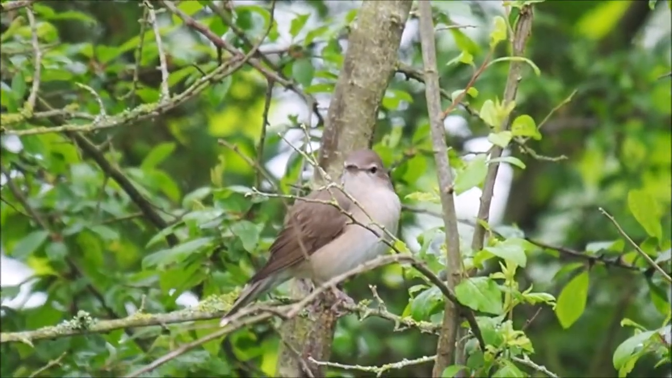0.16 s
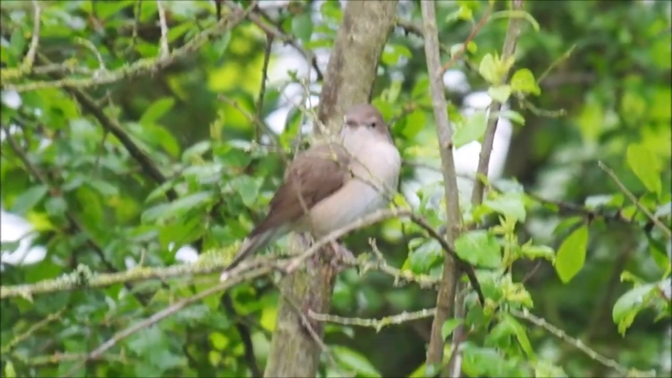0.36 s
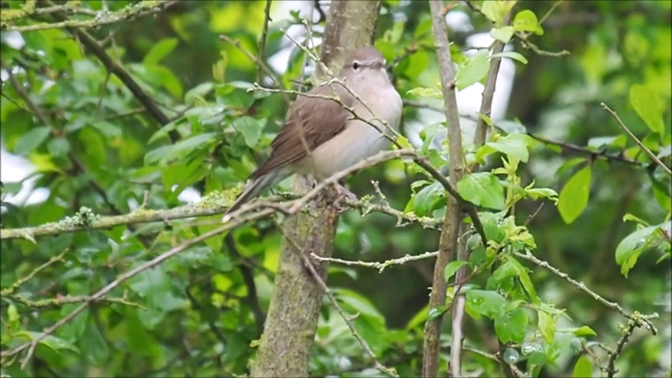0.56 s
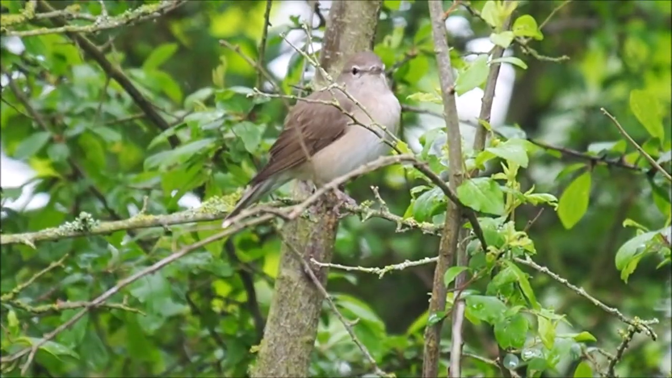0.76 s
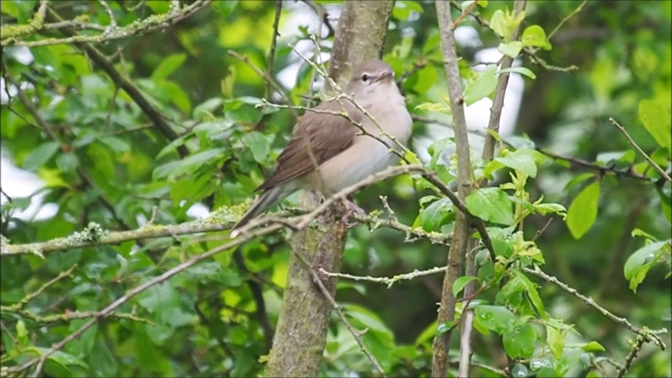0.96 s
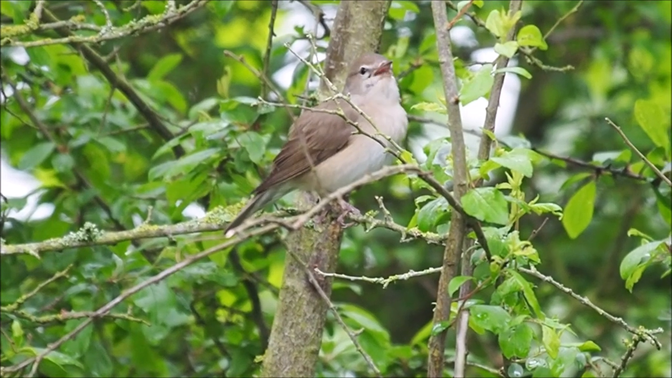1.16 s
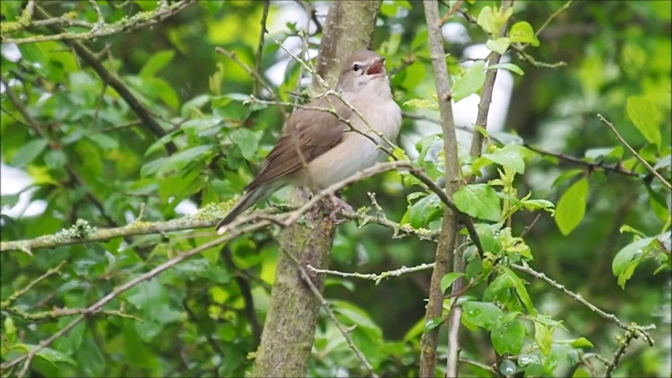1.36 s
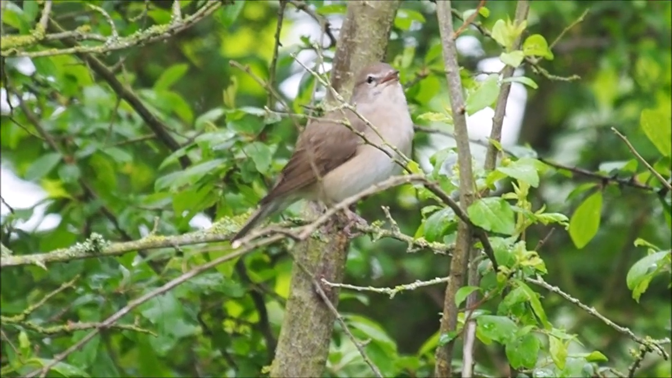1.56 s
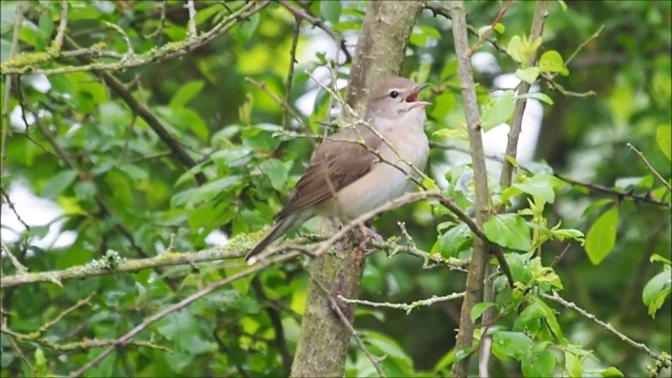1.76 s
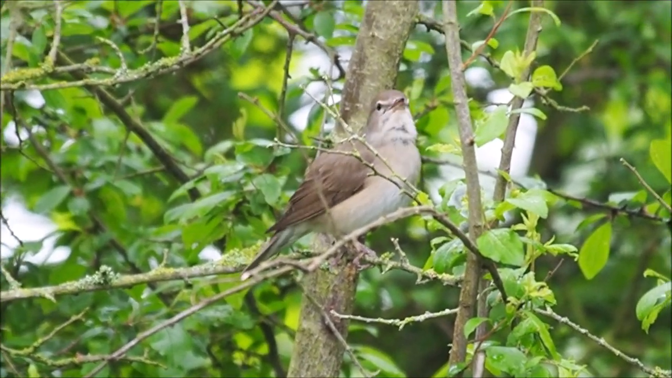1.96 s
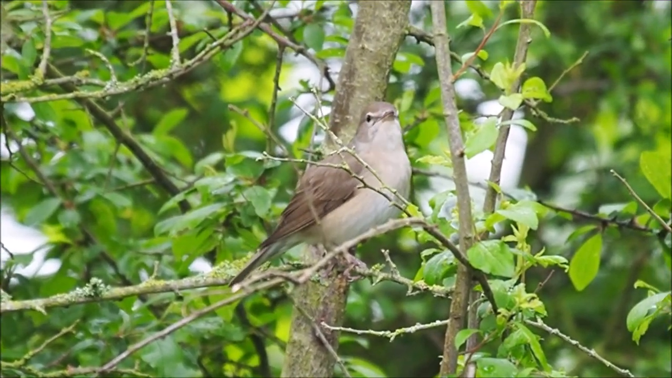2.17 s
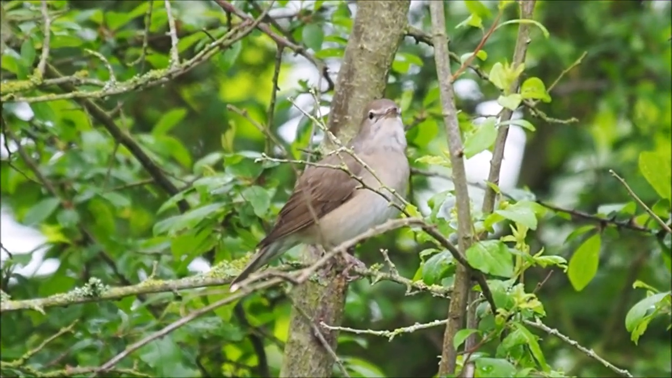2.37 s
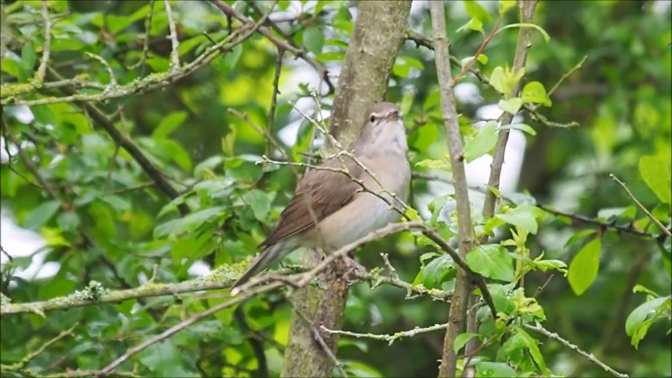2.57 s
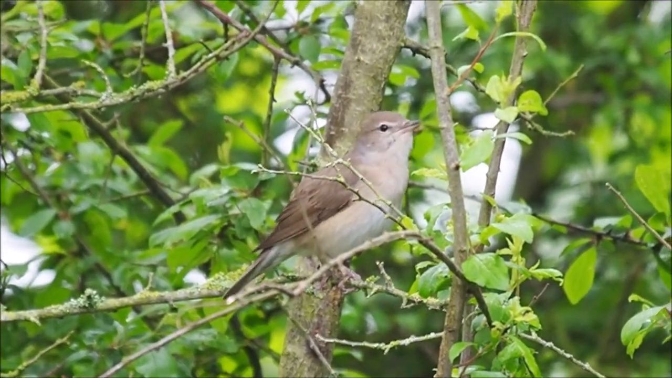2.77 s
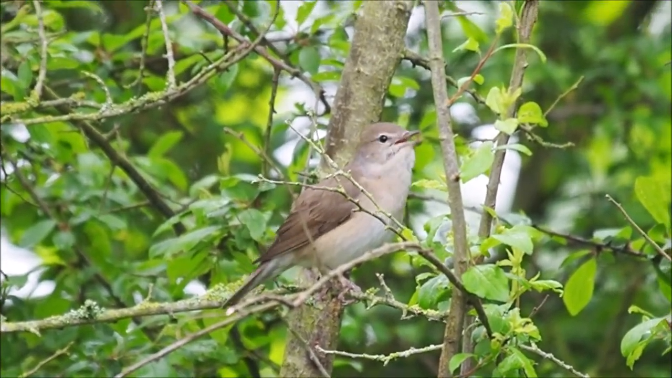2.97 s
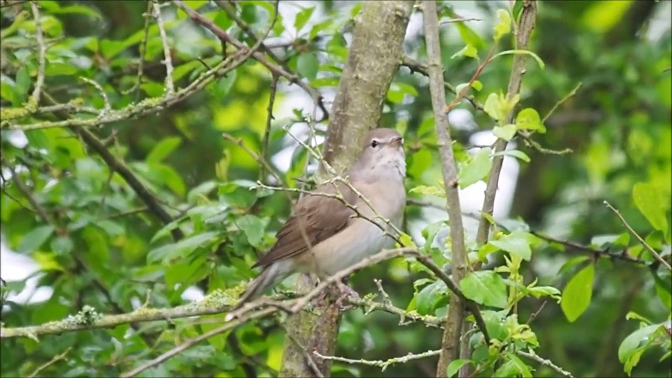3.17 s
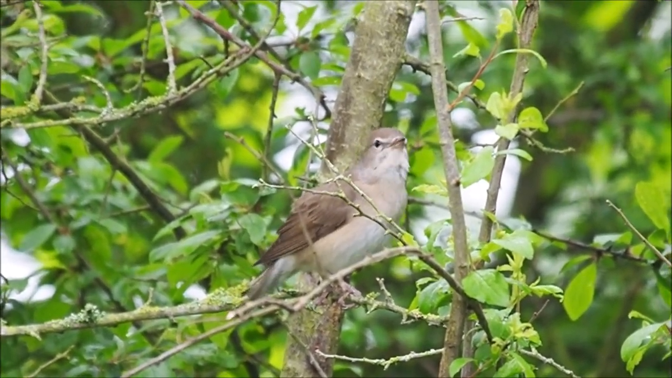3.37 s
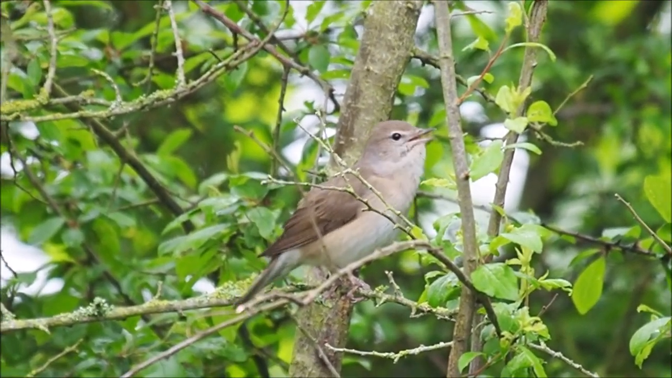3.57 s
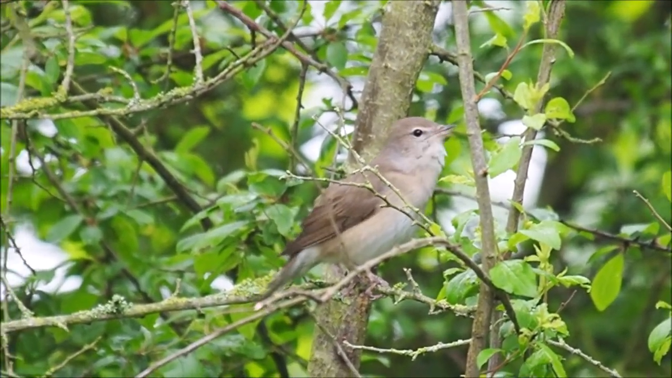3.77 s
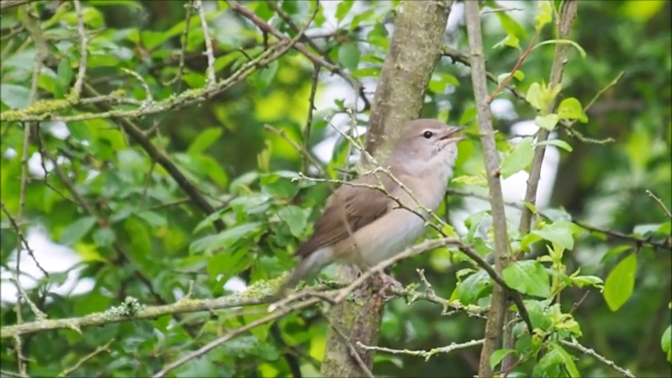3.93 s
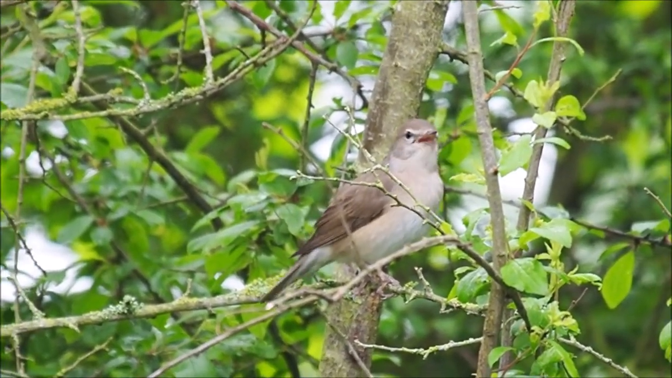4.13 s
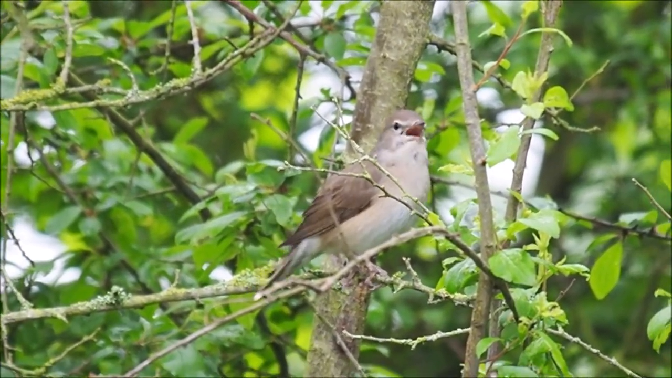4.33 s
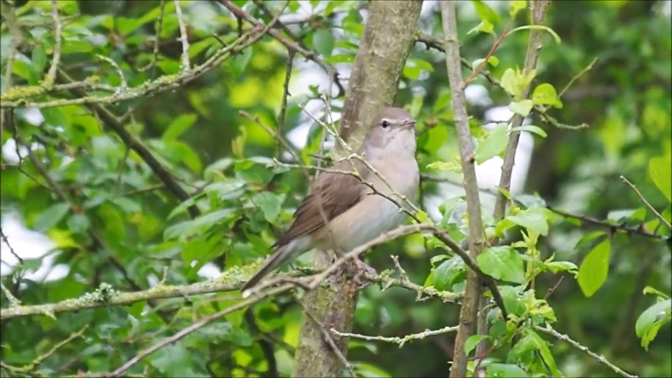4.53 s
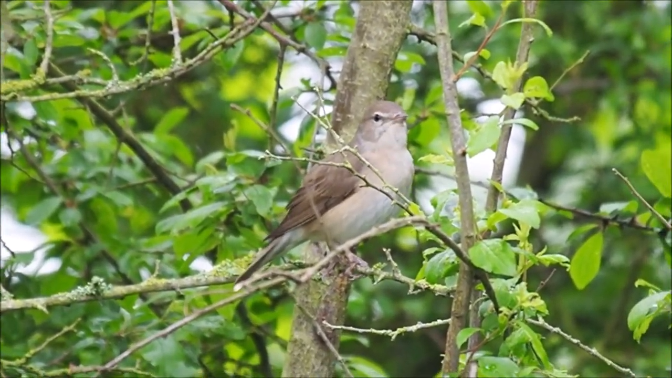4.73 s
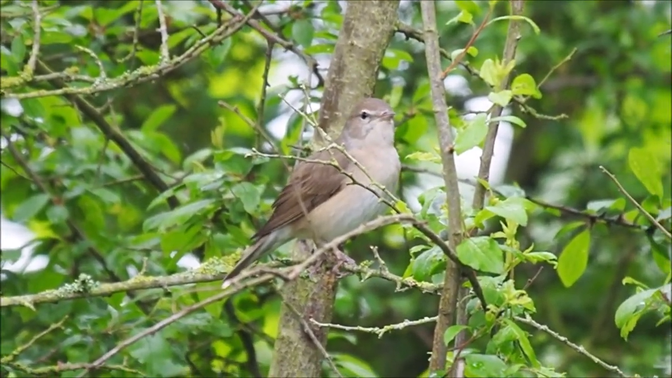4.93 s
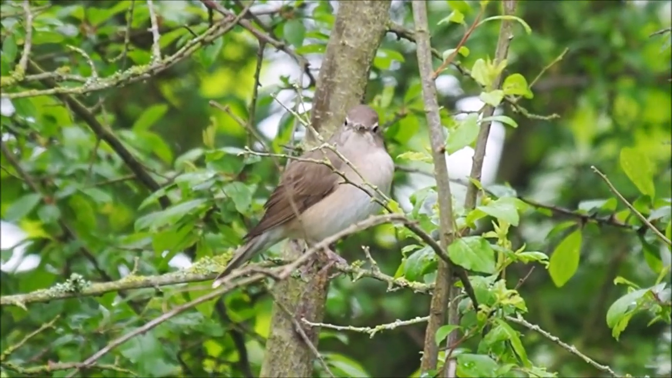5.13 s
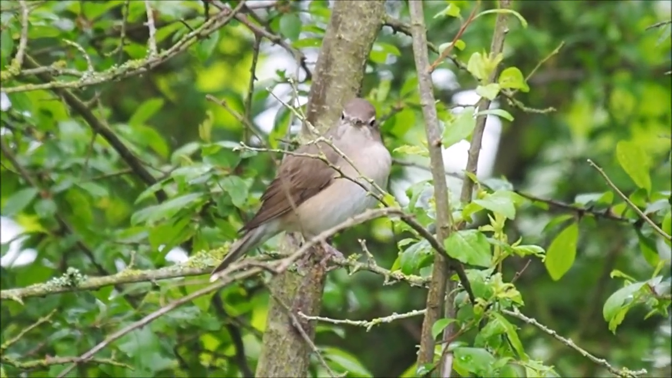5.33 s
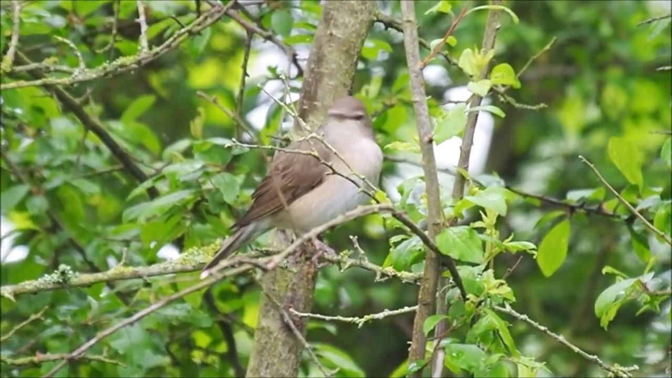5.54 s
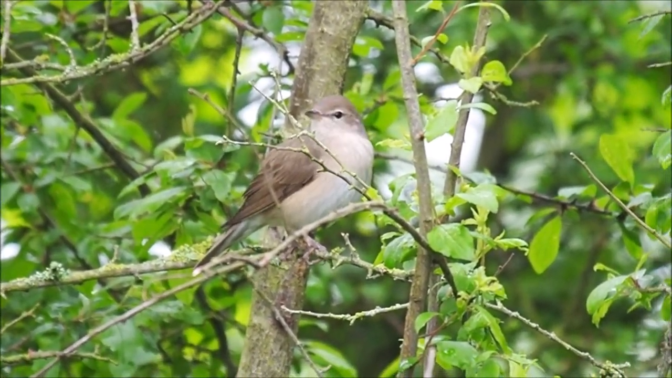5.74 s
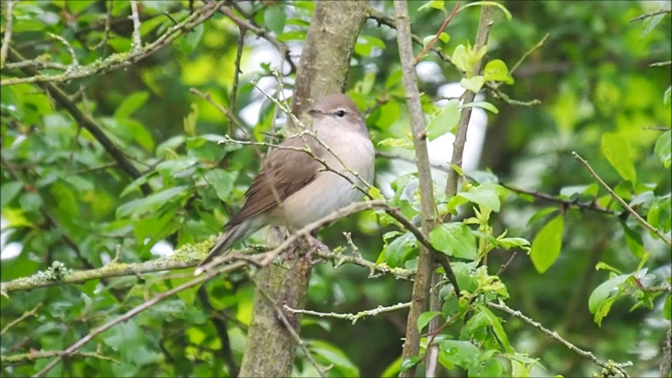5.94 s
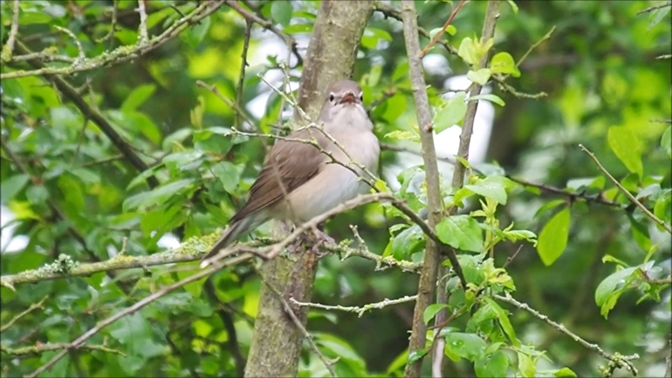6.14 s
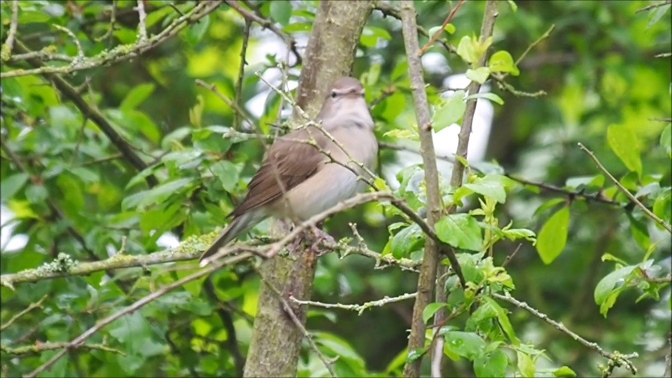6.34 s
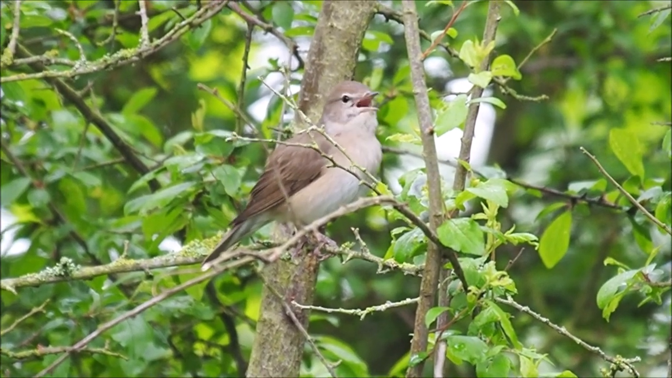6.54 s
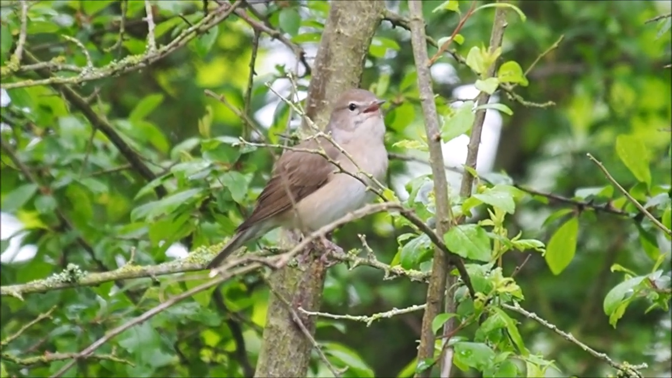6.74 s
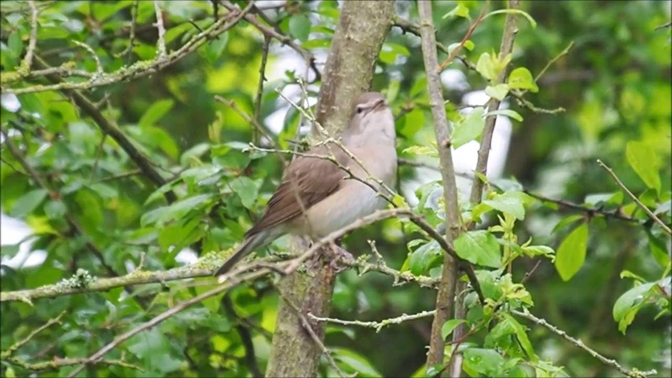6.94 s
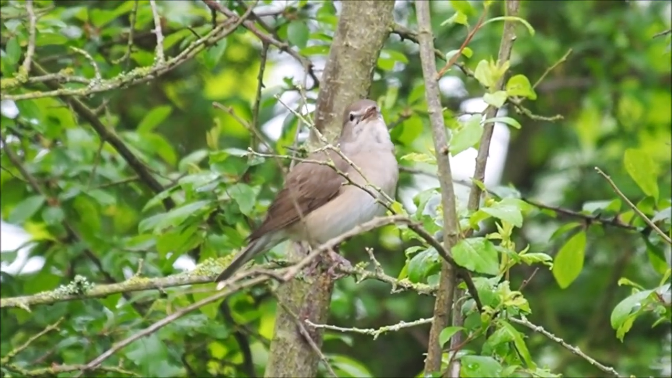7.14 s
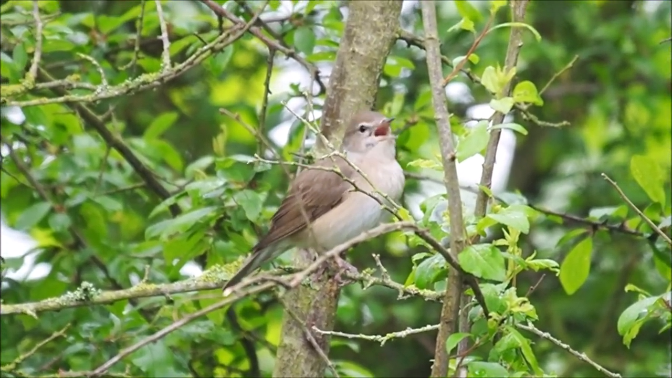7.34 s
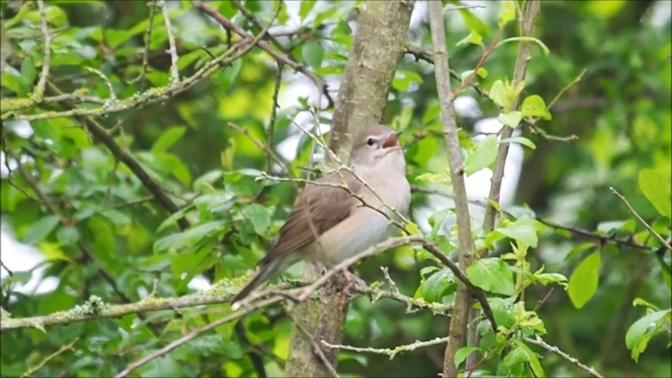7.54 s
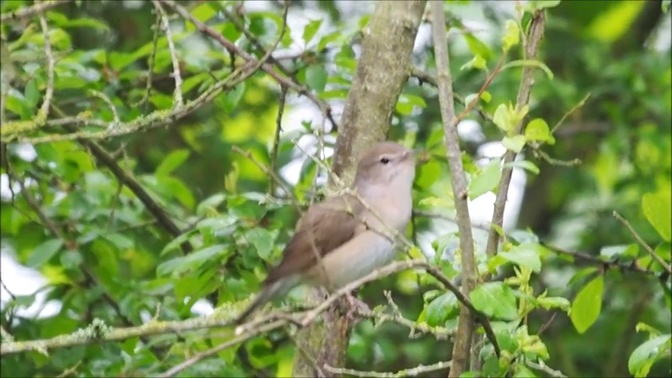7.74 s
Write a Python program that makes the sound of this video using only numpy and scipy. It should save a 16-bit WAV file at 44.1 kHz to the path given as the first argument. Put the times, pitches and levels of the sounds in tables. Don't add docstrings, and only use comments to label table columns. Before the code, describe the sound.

A small songbird sings fast, warbling phrases of whistles, trills and short buzzes close by in leafy shrubs, with faint distant birds and low road hum.

```python
import sys
import numpy as np
from scipy import signal
from scipy.fft import rfft, irfft, next_fast_len
from scipy.io import wavfile
from scipy.ndimage import uniform_filter1d

SR = 44100
rng = np.random.default_rng(int(sys.argv[2]) if len(sys.argv) > 2 else 0)


def rack_gain(trim_db):
    fader = np.asarray(trim_db, float)
    return 10 ** (fader / 20)


def generate_wav(sig):
    pcm = np.round(np.clip(np.atleast_2d(sig).T, -1, 1) * 32767).astype(np.int16)
    wavfile.write(sys.argv[1], SR, pcm)


N = 343980


def song():
    # start_s, length_ms, start_hz, end_hz, level_db
    even = [(1.412, 24, 5580, 5750, -44), (1.432, 69, 5600, 5330, -34), (1.733, 11.5, 2580, 3310, -26),
            (1.745, 9.3, 3300, 4690, -32), (1.754, 7, 5650, 4997, -42), (4.2515, 7.8, 3653, 6200, -26.5),
            (7.174, 3.5, 3154, 2450, -36), (7.1915, 2.9, 3200, 2450, -34), (1.822, 52, 6020, 4660, -34.5),
            (2.51, 15, 2295, 3330, -36), (2.313, 7, 2500, 1800, -40), (2.47, 16, 1350, 1800, -44),
            (2.522, 6, 3390, 2500, -39), (2.528, 8, 2500, 1850, -31), (2.698, 10, 1500, 1950, -40),
            (2.661, 18, 1820, 1696, -35.5), (2.732, 8.3, 2366, 2900, -35.5), (2.75, 5, 2060, 1750, -30),
            (4.413, 6, 2400, 2900, -38), (7.765, 20, 1680, 1600, -41), (2.928, 17.7, 3190, 3900, -25),
            (3.104, 5.5, 4150, 3050, -23.5), (3.492, 6, 2520, 3600, -28), (3.498, 5.5, 3490, 2250, -26.5),
            (3.504, 17, 2050, 2484, -37), (3.521, 7.3, 2540, 3300, -24.5), (3.67, 11.6, 3125, 2165, -30),
            (3.951, 65, 2437, 2767, -24.5), (4.08, 26, 3500, 2810, -27), (4.106, 36, 2740, 2500, -30),
            (6.143, 17, 2550, 3680, -31.5), (6.161, 9.9, 3755, 5460, -38.5), (6.175, 16, 4460, 3820, -35.5),
            (6.9, 21.6, 4284, 4110, -30.5), (7.06, 31.5, 4320, 5360, -43.5)]
    easing = [(1.5, 100, 5275, 5010, -31), (1.659, 40, 3230, 2810, -31.5), (1.761, 17, 4900, 4150, -35),
              (1.866, 56, 4794, 4040, -36.5), (1.968, 144, 3076, 2635, -36.5), (2.486, 24, 1850, 2300, -34),
              (2.536, 18, 1850, 1500, -39), (2.755, 25, 1750, 1450, -38), (2.74, 9.3, 2816, 2047, -30),
              (3.08, 14, 5740, 4575, -27.5), (3.686, 20, 2225, 2677, -30.5), (6.09, 34, 3000, 2240, -43),
              (6.242, 55, 5800, 4440, -38), (6.922, 8.76, 4050, 2455, -37.5),
              (6.932, 11.7, 2730, 3440, -34), (6.947, 5.4, 3270, 1960, -35), (6.952, 15, 1957, 2484, -33.5),
              (7.2, 23, 2900, 3715, -36.5), (7.743, 22, 2300, 1700, -35), (7.675, 22, 1290, 2160, -40.5),
              (6.169, 6.5, 5430, 4500, -51)]
    early = [(2.708, 24, 1950, 2300, -30), (2.908, 11.5, 2620, 2940, -30), (3.342, 20, 1584, 1676, -40),
             (3.363, 86, 1880, 1940, -33.5), (3.917, 37, 1916, 2316, -34), (4.143, 23, 2690, 3053, -26.5),
             (4.26, 22, 6390, 6250, -32), (4.283, 46, 6050, 5840, -25), (4.33, 30, 6210, 4280, -22),
             (4.419, 9, 2900, 3200, -27), (6.302, 53, 4327, 4100, -31.5), (6.418, 116, 2890, 2640, -43)]
    late = [(1.693, 25, 2730, 2146, -36.5), (2.446, 18.5, 1800, 1460, -41), (3.094, 10.7, 4510, 4080, -22),
            (4.243, 8.5, 3000, 3600, -39.5), (7.161, 13, 3500, 3200, -32.5),
            (7.1835, 7.9, 3450, 3210, -28.5), (7.094, 28, 5740, 5080, -36.5), (3.528, 4, 3300, 2500, -31)]
    bows = [(2.3, 13, 2250, 2500, -48), (3.114, 33, 2810, 2540, -26.5), (4.437, 16.5, 3370, 3437, -24),
            (6.408, 12.8, 2930, 3260, -42), (7.697, 48, 2260, 2390, -45.5)]
    arches = [(3.755, 30.88, 1629, 1432, -33.5)]
    dips = [(3.208, 31.3, 2130, 1665, -37), (6.974, 23.95, 2064, 2103, -36)]
    # start_s, length_ms, start_hz, middle_hz, end_hz, level_db
    opening = [(1.037, 21, 4450, 4310, 4100, -40), (1.058, 8, 4130, 3115, 2200, -40),
               (1.066, 19, 2300, 3310, 3380, -43.5), (1.085, 7, 3320, 2300, 1700, -47),
               (1.092, 18, 1750, 2136, 2240, -46), (1.115, 22, 2010, 1860, 1950, -44),
               (1.192, 30, 3820, 4540, 5700, -45), (1.226, 25, 6100, 5700, 5400, -40.5),
               (1.295, 10, 3730, 3600, 3500, -40), (1.305, 9, 3500, 3340, 2760, -32),
               (1.32, 4, 2700, 3210, 3600, -46), (1.324, 9, 3600, 3413, 2820, -39),
               (1.335, 10, 3000, 3600, 4010, -42), (1.345, 7, 3500, 3340, 2880, -34)]
    # start_s, length_s, rate_hz, pitch_swing (share), throb_depth (0-1)
    trill_rows = [(1.191, .031, 120, 0.07, 0.76), (1.402, 0.22, 117, 0.027, 0.15),
                  (1.655, 0.055, 79, 0.05, 0.38), (1.857, .061, 60, 0.0097, 0.37),
                  (1.963, 0.14, 50, 0.045, 0.4), (2.93, 0.025, 147, 0.061, 0.32),
                  (3.365, 0.096, 70, 0.064, 0.05), (3.945, 0.064, 61, 0.0035, 0.06),
                  (4.0745, .028, 175, 0.087, .3), (4.1025, .04, 144, 0.045, 0.04),
                  (4.2575, 0.075, 159, 0.034, 0.4), (4.4367, .024, 165, 0.048, 0.1),
                  (4.4363, .018, 340, .001, 0.27), (6.087, 0.0248, 99, 0.062, 0.47),
                  (6.302, 0.062, 95, 0.0009, 0.1), (6.408, 0.13, 110, 0.045, 0.95),
                  (7.061, 0.029, 116, 0.054, 0.95)]
    # from_s, to_s, later_by_s, pitch_ratio, level_change_db
    repeats = [(2.29, 2.33, .044, 1.01, 1.5), (2.89, 2.92, .081, 1.02, 2.5),
               (2.921, 2.95, .0805, .985, -.8), (3.19, 3.23, .047, .99, 1.5), (3.191, 3.231, .094, .93, .1),
               (3.475, 3.502, .075, .97, 1.5), (3.503, 3.54, .0752, 1.01, -2.5),
               (3.74, 3.78, .079, .995, -.5), (4.4, 4.425, .095, .98, .1), (4.426, 4.46, .098, 1.04, -4.5)]
    strokes = bent(even) + bent(easing, share=0.63) + bent(early, share=0.92) + bent(late, share=0.179)
    strokes += bent(bows, lift=0.073) + bent(arches, lift=0.22) + bent(dips, lift=-0.12)
    again, trills_again = [], []
    for first, last, later, ratio, change in repeats:
        for s, ms, start, mid, end, db in strokes:
            if first < s < last:
                again.append((s + later, ms, start * ratio, mid * ratio, end * ratio, db + change))
        for s, *rest in trill_rows:
            if first < s < last:
                trills_again.append((s + later, *rest))
    return sorted(strokes + again + opening), trill_rows + trills_again


def warbler():
    # start_s, length_ms, start_hz, end_hz, level_db
    second_side = [
        (1.865, 42, 4480, 4030, -33.5),
        (3.065, 10, 5910, 5780, -42),
        (3.902, 27, 2537, 2990, -30.5),
        (4.239, 9, 5010, 5990, -46),
        (6.27, 60, 3870, 4074, -41.5),
        (6.885, 17, 4790, 6900, -50),
    ]
    # start_s, length_ms, start_hz, end_hz, level_db
    side_lines = [
        (1.875, 45, 2150, 2045, -50.5),
        (6.3, 66, 2103, 2010, -56),
    ]
    # overtone_hz, level_db
    bright = [(4000, -22), (8500, -22), (10500, -10), (13000, 1), (16000, -5)]
    top_hz, throb_lag_s = 15830, 0.0026
    strokes, trills = song()
    hz, gain = tracks(strokes, 3.8, 0.25)
    t = np.arange(N) / SR
    unsteady = wobble(2.44)
    for s, length, rate, swing, throb in trills:
        inside = uniform_filter1d(1. * ((t > s) & (t < s + length)), size=90)
        flutter = 1.348 * np.cos(2 * np.pi * rate * (t - s)) + 0.365 * unsteady
        hz = hz * np.exp(inside * swing * flutter)
        chop = np.cos(2 * np.pi * rate * (t - s - throb_lag_s))
        gain = gain * np.maximum(1 + 2.0 * inside * throb * chop, 0)
    second_db, third_db, fourth_db = (
        db + read(bright, k * hz) - 60 * (k * hz > top_hz)
        for k, db in ((2, -21.5), (3, -22.5), (4, -29)))
    main = whistle(hz, gain, second_db, third_db, 0.15, fourth_db)
    other = whistle(*tracks(bent(second_side), 6.4, 0.37), -23, -50, 0.14)
    half_pitch = whistle(*tracks(bent(side_lines), 14, 0.35), -60, -60, 0.22)
    return main + other + scoops() + half_pitch


def scoops():
    # start_s, top_hz, level_db
    scoop_tops = [
        (6.585, 4320, -5),
        (6.609, 4400, 0.5),
        (6.631, 5190, 0),
        (6.654, 5090, 0.5),
        (6.682, 4980, -0.5),
        (6.712, 4910, 0.5),
        (6.742, 5190, -1),
        (6.771, 5500, 0.5),
        (6.798, 5190, 0.5),
        (6.82, 4600, -8),
    ]
    t = np.arange(N) / SR
    s, top_hz, db = np.transpose(scoop_tops)
    place = np.interp(t, s, np.arange(len(s)))
    nearest = np.round(place).astype(int)
    height = abs(2 * (place % 1) - 1) ** 2.6
    valley_hz = np.interp(t, s[[0, -1]], (3490, 3270))
    hz = uniform_filter1d(valley_hz + (top_hz[nearest] - valley_hz) * height, size=70)
    level_db = -38 + np.interp(t, s, db)
    inside = uniform_filter1d(1. * ((t > s[0]) & (t < s[-1])), size=220)
    octave_hz = np.minimum(2 * hz, 7500) * (1 + 0.028 * wobble(1.1))
    octave = whistle(octave_hz, inside * rack_gain(level_db - 13 - 10 * height), -60, -60, 0.37)
    flank_db = 5 * np.sin(np.pi * height)
    return whistle(hz, inside * rack_gain(level_db + flank_db), -50, -31, 0.24) + octave


def buzzes():
    # start_s, length_ms, start_pulse_hz, end_pulse_hz, level_db
    buzz_rows = [
        (2.421, 30, 590, 680, -40.5),
        (2.637, 28.3, 592, 710, -41),
        (3.895, 33, 618, 790, -37),
        (7.341, 93, 973, 859, -38.5),
        (7.424, 114, 845, 813, -38),
    ]
    # start_s, length_ms, start_pulse_hz, end_pulse_hz, level_db
    yip_rows = [
        (7.59, 15.7, 912, 1232, -37),
        (7.626, 15, 822, 1070, -38.5),
    ]
    # start_hz, end_hz
    throat_glides = [(2700, 2800), (2300, 2600), (3000, 3550), (3330, 5240), (5200, 4840), (4980, 4900),
                     (4440, 4500)]
    out, unsteady = np.zeros(N), wobble(3.2)
    rows = bent(buzz_rows, share=0.63) + bent(yip_rows, lift=0.2)
    for row, (start_hz, end_hz) in zip(rows, throat_glides):
        hz, gain = tracks([row], 6, 0.12)
        on = np.flatnonzero(gain > 1e-7)
        hz = hz[on] * 1.0
        pulse_hz = tracks([row], 6, 0.12)[0] * (1 + 0.0088 * unsteady)
        hz = pulse_hz[on]
        turn = 2 * np.pi * np.cumsum(hz) / SR
        throat = np.linspace(start_hz, end_hz, len(on))
        width_hz = 0.26 * throat
        stack = np.zeros(len(on))
        for k in range(2, 11):
            share = 0.4 / k + 1 / (1 + ((k * hz - throat) / width_hz) ** 4)
            stack += share * np.sin(k * turn + k * k)
        out[on] += gain[on] * evened(stack)
    return out * (1 + 0.18 * wobble(1.2))


def breath(near):
    # band_hz, level_db
    rush_colour = [(2000, -19), (4000, -1), (7000, 3), (10000, 20), (13000, 37), (16000, -7)]
    size = next_fast_len(N)
    colour = rack_gain(read(rush_colour, np.fft.rfftfreq(size, 1 / SR)))
    rush = evened(irfft(rfft(rng.standard_normal((2, size))) * colour, size)[:, :N])
    high = signal.sosfilt(signal.butter(4, 4300, "high", fs=SR, output="sos"), near)
    keep = np.exp(-1 / (0.01 * SR))
    power = signal.lfilter([1 - keep], [1, -keep], high ** 2)
    return rack_gain(-15) * power ** 0.53 * (rush + .2 * rush[::-1])


def bent(rows, share=.5, lift=0.):
    return [(s, ms, a, a * (b / a) ** share * np.exp(lift), b, db) for s, ms, a, b, db in rows]


def tracks(rows, soft_ms, swell=0.):
    hz, gain = np.zeros(N), np.zeros(N)
    for s, ms, start, mid, end, db in rows:
        first = round(s * SR)
        a = max(first, 0)
        u = np.linspace(0, 1, max(round(ms * SR / 1000), 2))
        u = u[a - first:][:N - a]
        curve = np.polyfit([0, .5, 1], np.log([start, mid, end]), 2)
        hz[a:a + len(u)] = np.exp(np.polyval(curve, u))
        gain[a:a + len(u)] = rack_gain(db) * (1 - swell * (2 * u - 1) ** 2)
    on = np.flatnonzero(hz)
    width = max(round(soft_ms * SR / 2000), 1)
    gain = uniform_filter1d(uniform_filter1d(gain, width), width)
    return uniform_filter1d(np.interp(np.arange(N), on, hz[on]), size=40), gain


def whistle(hz, gain, second_db, third_db, rough, fourth_db=-90):
    turn = 2 * np.pi * np.cumsum(hz) / SR
    tone = np.zeros(N)
    for k, db in enumerate((0, second_db, third_db, fourth_db), 1):
        if np.max(db) > -55:
            tone += rack_gain(db) * np.sin(k * turn)
    return np.sqrt(2) * gain * tone * (1 + rough * wobble(1.5))


def wobble(ms):
    width = round(ms * 44)
    return evened(uniform_filter1d(uniform_filter1d(rng.standard_normal(N), width), width))


def evened(x):
    return x / np.sqrt(np.mean(x ** 2) + 1e-20)


def read(points, hz):
    f, value = np.transpose(points)
    return np.interp(np.log(hz + 1), np.log(f + 1), value)


def ports(x):
    # band_hz, left_right_db
    lean = [(700, 2), (1400, 4.5), (3100, -2.5), (5500, -6.5), (15000, 5)]
    # band_hz, left_leads_rad
    lead = [(100, 0.01), (950, -0.6), (2670, -1.54), (3700, -1.52), (5500, -0.97), (16000, 0.22)]
    size = next_fast_len(N)
    hz = np.fft.rfftfreq(size, 1 / SR)
    half = rack_gain(read(lean, hz) / 2) * np.exp(.5j * read(lead, hz))
    pair = np.array([half, 1 / half]) / np.sqrt((abs(half) ** 2 + abs(half) ** -2) / 2)
    return irfft(rfft(x, size) * pair, size)[:, :N]


def shrubs(x, t60, slap_s, slap_db):
    t = np.arange(SR // 2) / SR
    taps = rng.standard_normal((2, len(t))) * (rng.random((2, len(t))) < .05)
    decay = rack_gain(-60 * t / t60) * np.minimum(t / 0.003, 1)
    hedge = rack_gain(slap_db) * np.exp(-((t - slap_s) / 0.00074) ** 2)
    tail = (taps + .5 * taps[::-1]) * (decay + hedge)
    return signal.fftconvolve(x[None], tail / np.linalg.norm(tail[0]), axes=1)[:, :N]


def far_birds(rows, flutter_hz, swing):
    t = np.arange(N) / SR
    tremble = 1 + swing * np.sin(2 * np.pi * flutter_hz * t)
    out = np.zeros(N)
    for k in range(2):
        hz, gain = tracks(rows[k::2], 14, .5)
        out += whistle(hz * tremble, gain, -60, -60, 0.39)
    return out


def far_seeps():
    # start_s, length_ms, end_hz, level_db
    seep_rows = [
        (-.04, 249, 8400, -56.5),
        (1.54, 161, 8530, -54),
        (3.76, 209, 8540, -48.5),
        (5.755, 265, 8410, -55.5),
        (7.74, 220, 8750, -53.5),
    ]
    # start_s, length_ms, start_hz, end_hz, level_db
    peep_rows = [
        (3.51, 98, 8270, 7240, -52.5),
        (3.68, 59, 7550, 7340, -51),
        (3.85, 42.5, 7470, 7410, -56),
        (4.0, 95, 7930, 7740, -53.5),
    ]
    falls = bent([(s, ms, 9300, end_hz, db) for s, ms, end_hz, db in seep_rows], share=0.71)
    under_hz, under = tracks(falls, 14, 0.31)
    under_line = whistle(0.96 * under_hz, rack_gain(-10) * under, -60, -60, .3)
    return far_birds(sorted(falls + bent(peep_rows)), 45, 0.0066) + under_line


def far_whistles():
    # start_s, length_ms, level_db
    rise_rows = [
        (.47, 79.7, -50),
        (.63, 120, -51),
        (3.17, 39.9, -45),
        (3.3, 97.9, -46.5),
        (5.4, 80, -49),
    ]
    # start_s, length_ms, start_hz, end_hz, level_db
    glide_rows = [(.2, 50, 2600, 2660, -59), (.255, 65, 2800, 3300, -53), (.285, 22, 3300, 3810, -53),
                  (.35, 65, 4860, 4830, -55), (.44, 60, 2700, 3145, -57), (2.572, 18, 3550, 3200, -52),
                  (2.598, 15, 3400, 3700, -52), (2.617, 22, 3200, 2930, -50), (3.49, 53, 3340, 3700, -42.5),
                  (4.85, 70, 3300, 3400, -57), (4.9, 40, 2900, 2650, -55), (5.005, 39, 3620, 3430, -49),
                  (5.06, 22, 3200, 2950, -52), (5.08, 105, 2580, 2690, -55), (5.185, 40, 2680, 3300, -53),
                  (5.2, 42, 3620, 3250, -48.5), (5.243, 30, 3250, 3550, -49.5),
                  (5.34, 45, 3000, 2750, -51.5), (5.585, 90, 3380, 3370, -54.5), (5.7, 50, 3900, 4050, -56),
                  (5.88, 35, 3600, 3300, -53), (5.916, 65, 3300, 3250, -50.5),
                  (7.63, 47, 2700, 3210, -47.5)]
    rises = [(s, ms, 2650, 3250, 3500, db) for s, ms, db in rise_rows]
    return far_birds(sorted(rises + bent(glide_rows)), 30, 0.015)


def leaf_squeaks(rasp):
    # start_s, length_ms, start_hz, end_hz, level_db
    squeak_rows = [(.355, 60, 11500, 11700, -58), (.655, 28, 12000, 11600, -61),
                   (.8, 74.5, 12200, 11300, -57), (1.105, 62, 11900, 11100, -54),
                   (1.34, 69, 11500, 11000, -60.5), (1.49, 65, 11900, 11300, -54.5),
                   (1.68, 66, 11250, 11800, -54), (1.828, 70.2, 11000, 12300, -52),
                   (2.0, 52.3, 11300, 11900, -56)]
    hz, gain = tracks(bent(squeak_rows, lift=.025), 14, 0.25)
    tone = whistle(hz * (1 + 0.018 * wobble(1.53)), gain, -60, -60.5, 0.64)
    return (rack_gain(3.0) * tone + 1.2 * gain * rasp) * rack_gain(np.array([[-1.5], [1.5]]))


def air():
    # band_hz, level_db (per Hz)
    hum_colour = [(35, -38.5), (49, -7.5), (130, -15.5), (240, -22), (457, -23), (630, -24), (1030, -18.5),
                  (1610, -28), (2560, -30.5), (3360, -26.5), (6380, -37.5), (9000, -38.5), (11700, -59.5)]
    # band_hz, level_db (per Hz)
    hiss_colour = [(5290, -12.5), (9000, -24), (10400, 1.5), (11700, 8.5), (13700, 13.5), (15100, 11),
                   (16000, 4.5)]
    # band_hz, likeness (0-1)
    likeness = [(30, 0.81), (150, 0.065), (550, 0.31), (1000, 0.48), (2000, 0.012), (5000, 0.0096),
                (8000, 0.35), (13000, 0.8)]
    # band_hz, left_right_db
    hum_lean = [(60, -0.5), (950, 1.5), (4000, 1), (8000, 2), (13000, -1.5)]
    frames, hz = N // 256 + 5, np.fft.rfftfreq(1024, 1 / SR)
    a, b, c, d, patches = rng.standard_normal((frames, 513, 5)).T
    patches = evened(uniform_filter1d(uniform_filter1d(patches, 14, 0), 10, 1))
    same = np.clip(read(likeness, hz), -1, 1)[:, None]
    left = a + 1j * b
    z = np.array([left, same * left + np.sqrt(1 - same ** 2) * (c + 1j * d)])
    balance_db = np.array([.5, -.5])[:, None, None] * read(hum_lean, hz)[:, None]
    patch_db = 3.0 * patches * np.minimum(hz / 3000, 1)[:, None]
    z = z * rack_gain(balance_db + patch_db)
    rasp_band = 1 / (1 + ((hz - 13300) / 1500) ** 4)
    colours = rack_gain(read(hum_colour, hz)), rack_gain(read(hiss_colour, hz)), rasp_band
    hum, hiss, rasp = (
        evened(signal.istft(z * colour[:, None], nperseg=1024, noverlap=768)[1][:, :N])
        for colour in colours)
    return rack_gain(-43.5) * hum + rack_gain(-53.5) * hiss + leaf_squeaks(rasp)


def scene():
    near = warbler() + buzzes()
    seeps, whistles = far_seeps(), far_whistles()
    far = seeps * rack_gain(np.array([[5.5], [-5.5]])) + whistles * rack_gain(np.array([[1.5], [-1.5]]))
    far = far + rack_gain(-7.5) * shrubs(seeps + whistles, t60=0.35, slap_s=0.083, slap_db=-30)
    near_echo = rack_gain(-8) * shrubs(near, t60=0.29, slap_s=0.0333, slap_db=-20.0)
    return rack_gain(1.67) * ports(near) + near_echo + breath(near) + far + air()


def band_limit(x):
    return signal.sosfilt(signal.butter(12, 15830, fs=SR, output="sos"), x)


def record(dry):
    mix = dry - 0.0089
    return band_limit(mix)


dry = scene()
out = record(dry)
generate_wav(out)
```